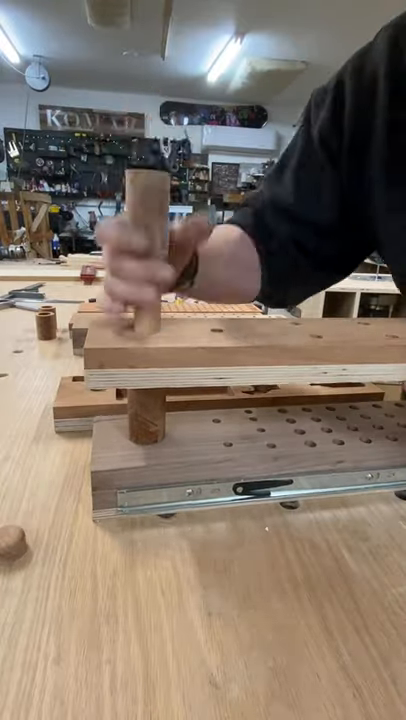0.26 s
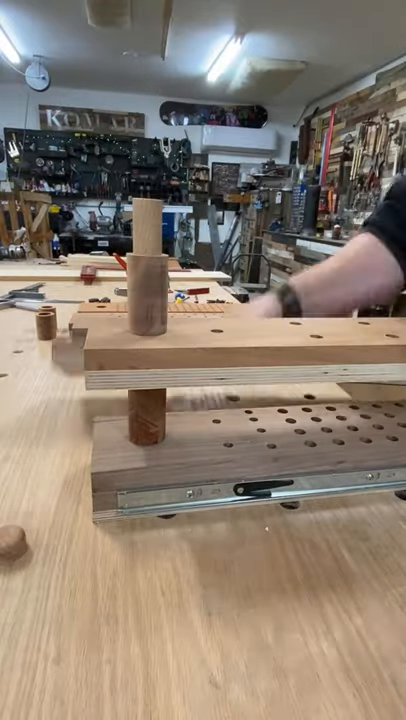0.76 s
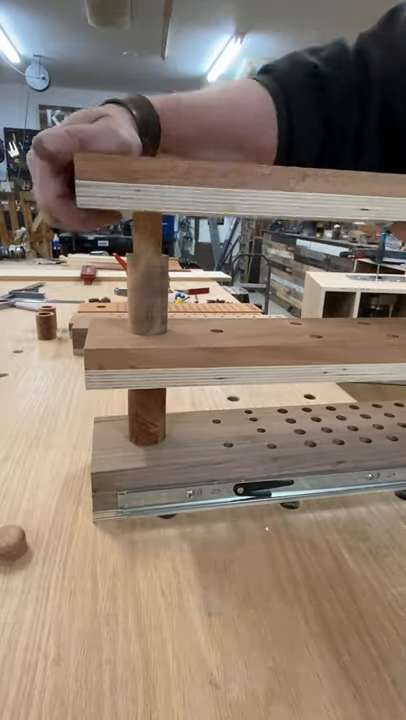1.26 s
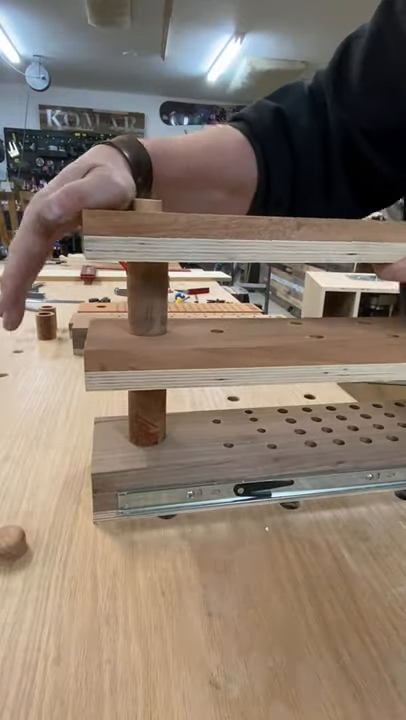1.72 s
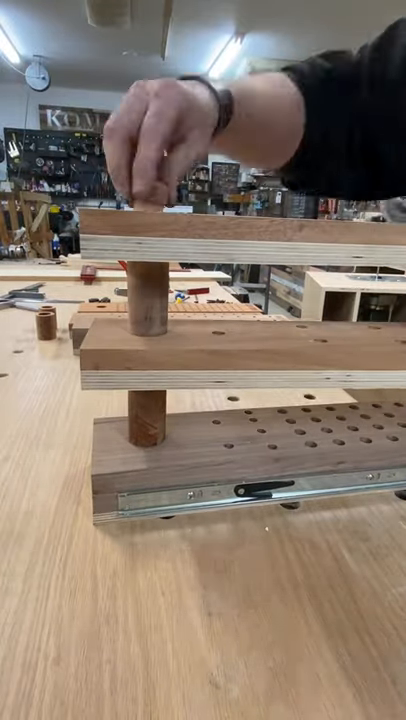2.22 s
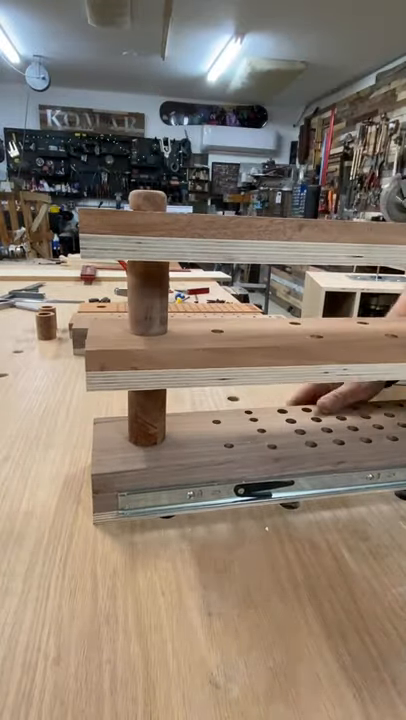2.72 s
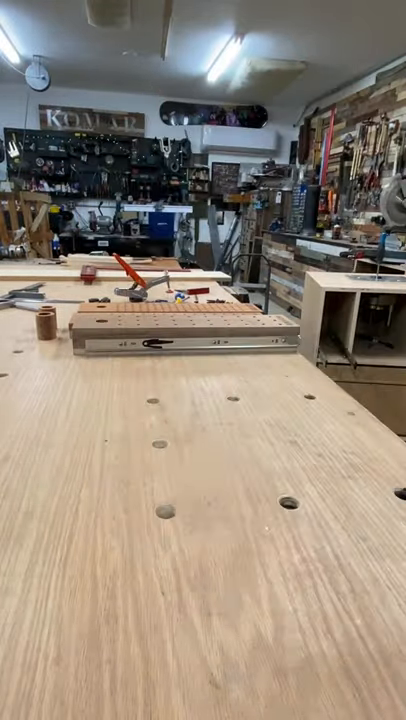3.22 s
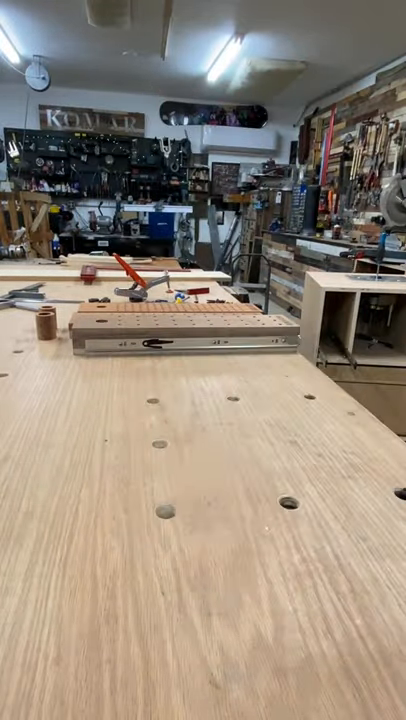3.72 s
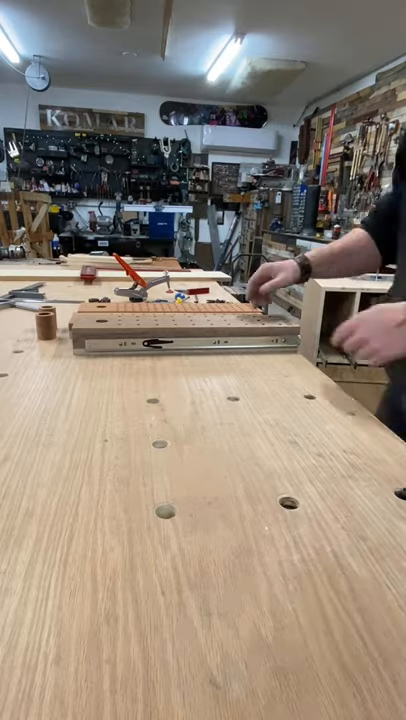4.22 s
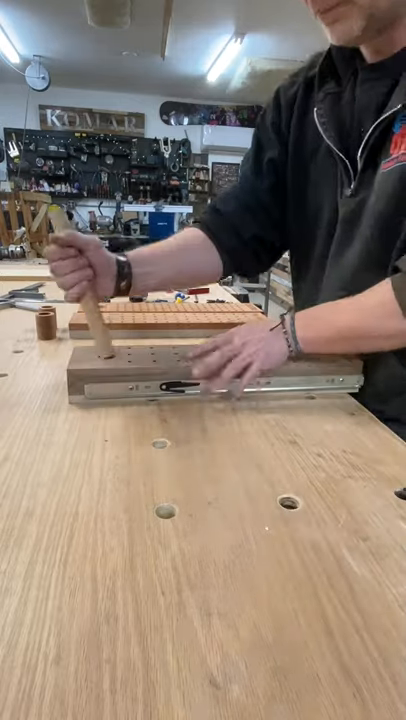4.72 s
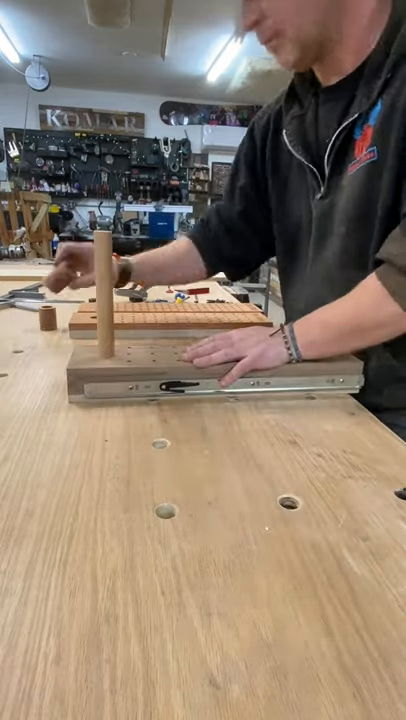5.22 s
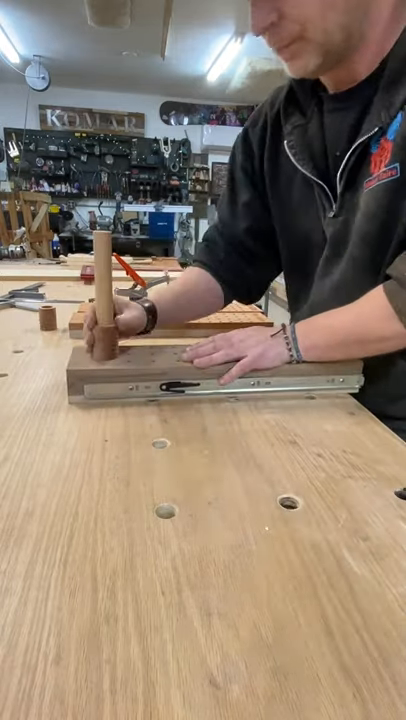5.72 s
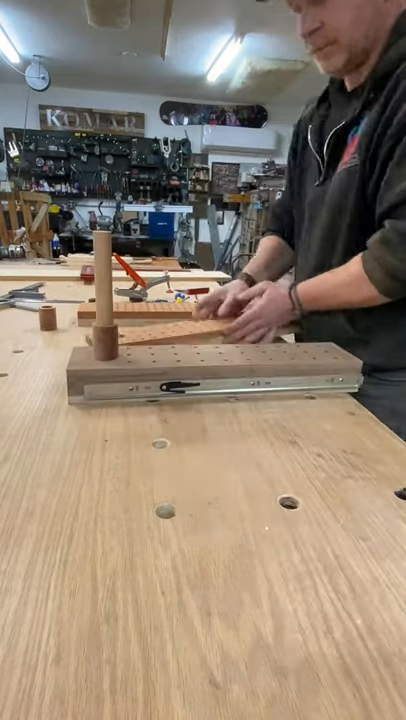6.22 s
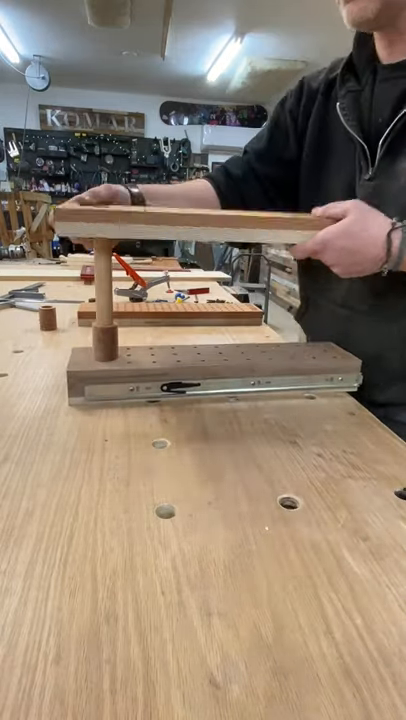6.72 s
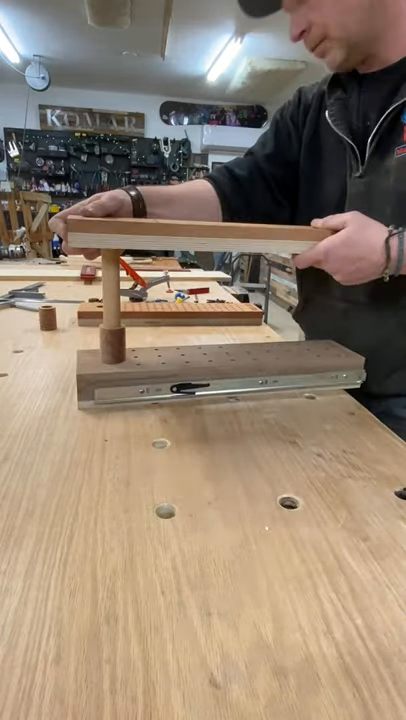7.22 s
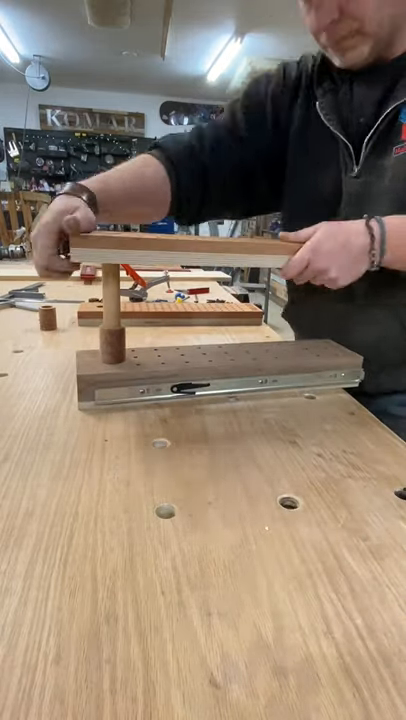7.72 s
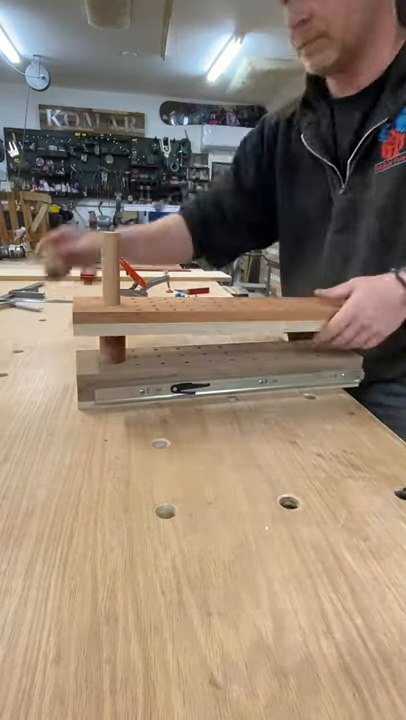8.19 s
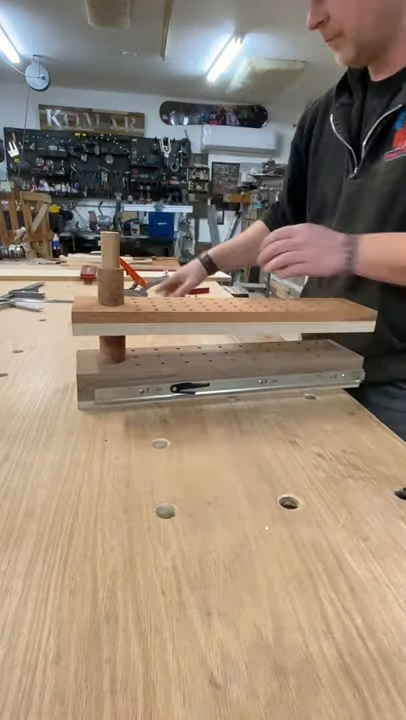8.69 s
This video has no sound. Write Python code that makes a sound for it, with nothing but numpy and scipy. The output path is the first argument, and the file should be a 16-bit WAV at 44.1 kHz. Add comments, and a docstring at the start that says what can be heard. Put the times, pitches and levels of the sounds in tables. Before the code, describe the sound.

Close, dry wood-on-wood knocks and gritty short slides as pieces are stacked on a bench in a quietly humming, well-damped workshop.

```python
"""Woodwork at the bench

Wooden boards, dowels and spacer sleeves slide together and knock down on a workbench, close to the microphone.
Each contact is a short noise crack that rings the piece, the bench and the dowel, and scatters in the room.
Wood rubbing on wood is a string of tiny slips through the same modes; cloth and skin are smooth shaped noise.
The workshop is well damped: ventilation is a low noise rush with a few faint, unsteady motor lines."""
import sys
import numpy as np
from scipy import signal
from scipy.fft import rfft, irfft, next_fast_len
from scipy.io import wavfile
from scipy.ndimage import map_coordinates

SR = 44100
rng = np.random.default_rng(int(sys.argv[2]) if len(sys.argv) > 2 else 0)


def unload_audio(sound):
    """Save the sound as a 16-bit wav file, at the path given as the first command line argument."""
    columns = np.transpose(np.atleast_2d(sound))
    # keep every value between -1 and 1, then stretch to whole-number steps
    steps = np.round(np.clip(columns, -1, 1) * 32767)
    wavfile.write(sys.argv[1], SR, steps.astype(np.int16))


N = 394694
HIT_SIZE = 16384  # samples in one hit with its tail
TOP_HZ = 15900  # upper band limit
MID_HZ, MID_OCTAVES = 1400, 1.7  # centre and width of the midrange; brightness tilts about this centre
NEAR_UNTIL_S = 2.7  # the stack stands close to the microphone until it is lifted away
NEAR_DOWEL_DB, FAR_DOWEL_DB = 5.5, -8  # base strength of the dowel's ring before and after that

# Ventilation colour, relative: f/Hz, density/dB per Hz
AIR_COLOUR = [(30, -51.5), (60, -41.5), (100, -19.5), (150, -16), (240, 2.5), (400, -9), (490, -9),
              (720, -19), (960, -16.5), (1300, -25.5), (3000, -38.5), (5600, -40.5), (16000, -43)]
# Fan motor lines: f/Hz, level/dB RMS
MOTOR_LINES = [(119.8, -76), (240, -73), (479.1, -70), (958.2, -78)]
# Decay of the room: f/Hz, T60/s
ROOM_T60 = [(100, .24), (260, 0.18), (700, 0.12), (1840, 0.098), (4850, 0.13), (12800, 0.12)]
# Colour of what is sent to the room, relative: f/Hz, level/dB
ROOM_SEND = [(100, -14.5), (300, -2), (1000, 0), (3000, -4), (8000, -10), (15000, -4.5)]
# Likeness of left and right in diffuse sound: f/Hz, correlation
LIKENESS = [(200, 0.95), (600, 0.96), (1200, 0.78), (3000, 0.33), (12000, 0.77)]

# Level difference between the microphone ports: f/Hz, left minus right/dB
PORT_BALANCE = [(60, -2.5), (110, 0), (200, 1.5), (380, 0), (700, 0.5), (1290, 1.5), (2380, 1.5),
                (4400, 1.5), (8120, -1.0), (12500, -4), (15000, -3)]
# Phase between the ports, a full turn slipping near 3 kHz: f/Hz, left lead/rad
PORT_LEAD = [(1400, 0), (2000, -1.1), (2500, -.9), (2850, -1.8), (3050, -3.7), (3500, -6.4), (5300, -6.6),
             (7500, -6.1), (10500, -5.1)]
# Colour shared by both ports: f/Hz, level/dB
PORT_COLOUR = [(2200, 0), (2800, 0.5), (3600, 0.5), (6600, 0.5), (7400, -3), (8400, -0.5), (12000, -0.5),
               (14500, -3)]

# Modes of the bench top with the boards on it: f/Hz, width/Hz, relative level/dB
BENCH_MODES = [(127.3, 9.7, 7.5), (228.9, 7.3, 6), (229.4, 15, 17), (243.5, 24, 17.5), (311.8, 29, -6.5),
               (345, 76, 7), (395, 82, -3.5), (471.6, 12, 7.5), (615, 54, 3), (705, 430, -7),
               (1033, 190, 3.5), (1005, 67, -1), (1136.3, 8, -2), (1250, 38, -4), (1390, 91, 5),
               (1640, 63, -0.5), (1830, 8, 2.5), (2150, 55, 3)]
# Modes of the upright dowel and its sleeves: f/Hz, width/Hz, relative level/dB
DOWEL_MODES = [(2210, 84, -6.5), (3720, 140, 6), (5220, 330, 2.5), (5700, 970, -1), (6370, 250, -1.5),
               (9010, 260, -2.5), (12000, 1400, -2)]

# Fingers shifting on the wood: start/s, end/s
GRIPS = [(0.01, 2.8), (6.3, 7.8)]
# Colour of skin on wood, relative: f/Hz, density/dB per Hz
SKIN_COLOUR = [(300, -28), (2000, -10.5), (5500, 2), (7000, -4.5), (9000, -2.5), (16000, -6)]
# Raw colour of rubbing, relative: f/Hz, density/dB per Hz
RUB_COLOUR = [(50, -49.5), (100, -26), (160, -14), (240, -1.5), (370, -5), (500, 0), (850, -8),
              (1500, -14.5), (2800, -25.5), (5000, -34), (8500, -28.5), (16000, -36)]
# Band edges for rubbing: f/Hz
RUB_EDGES_HZ = [150, 700, 2400, 7000, 16000]
# Quick slides over bench or dowel; the one at 1.7 s is a board sliding on a sleeve just before it lands: peak
# t/s, rise/s, fall/s, level before the swell/dB, brightness/dB per octave, midrange/dB
SLIDES = [(0.11, 0.03, 0.014, -38.5, -0.9, -8), (0.163, 0.018, 0.011, -29, -2.2, -0.05),
          (0.383, 0.017, 0.013, -33, -3, -0.5), (0.41, 0.006, 0.009, -29.5, -4, 9),
          (1.7, 0.02, 0.022, -39.5, 2.1, 4), (2.65, 0.0083, 0.034, -47, 0, 1),
          (2.815, 0.058, 0.073, -39, 0.4, 9), (2.93, 0.068, 0.047, -34.5, -1.3, 1),
          (3.58, 0.07, 0.17, -52, -1.35, 6), (4.376, 0.032, 0.044, -56, 1, 0.5),
          (4.492, 0.067, 0.093, -43, 1.84, 2.6), (5.54, 0.044, 0.029, -34, -2, -9),
          (6.043, 0.084, 0.11, -41.5, 1, 4.5), (6.186, 0.011, 0.057, -42.5, -1.5, 10.5),
          (7.808, 0.035, 0.055, -32, 0.9, -10.5), (8.73, 0.036, 0.088, -43, 1.1, 3.5)]
# Pieces worked slowly into place; the one at 4.893 s is a dowel sliding briefly in its hole just before a
# knock: peak t/s, rise/s, fall/s, level before the swell/dB, brightness/dB per octave
DRAGS = [(0.549, 0.03, 0.046, -51.5, 0.3), (1.279, 0.084, 0.061, -40, -1.1), (1.36, 0.08, 0.073, -40, 1.4),
         (1.51, 0.037, 0.05, -41.5, 0.2), (2.0, 0.095, 0.049, -48.5, 3.5),
         (2.309, 0.037, 0.21, -53.5, -0.6), (2.523, 0.015, 0.036, -50.5, 2.5), (4.55, 0.05, 0.11, -37, 1.5),
         (4.83, 0.068, 0.061, -42, -1.5), (4.893, 0.016, 0.0067, -30.5, 2.7),
         (4.999, 0.046, 0.047, -45.5, -0.0), (6.82, 0.1, 0.074, -53.5, 1), (7.15, 0.083, 0.064, -43, -0.7),
         (7.308, 0.08, 0.082, -43, 0.8), (7.5, 0.091, 0.11, -51.5, 1.3)]
# Clothing swishes: peak t/s, rise/s, fall/s, level before the swell/dB, brightness/dB per octave
SWISHES = [(2.131, 0.021, 0.038, -62, -3.5), (3.139, 0.036, 0.086, -56.5, -2.5),
           (3.379, 0.073, 0.04, -55.5, -1), (3.965, 0.17, 0.11, -63.5, -0.7)]
# Tone of each kind of rubbing, one value per rubbing band: relative level/dB
SLIDE_TONE = [-1.5, -7, -7, -14]
DRAG_TONE = [0, -11.5, -19.5, -28.5]
SWISH_TONE = [-21, -7, 3.5, -1]

# Band edges for contacts: f/Hz
HIT_EDGES_HZ = [90, 320, 800, 2400, 7000, 16000]
# A dowel or sleeve lands in its seat:
# t/s, level/dB, brightness/dB per octave, midrange/dB, piece f/Hz, relative piece ring/dB, room send/dB
SEATINGS = [(0.1282, -39, -2.5, 4, 498, 6, 1), (0.1507, -36, -2, 7, 462, -6, 3.5),
            (0.1832, -23.5, -3.5, 6.5, 427, -8.5, 5.5), (0.3714, -37.5, 2.4, -10, 497, -4.5, -1),
            (0.4048, -30.5, 1, -8, 507, -2.5, 0), (0.4192, -17.5, 1.84, 3, 5263, 5.5, -3.5),
            (4.8992, -18.5, 2, -1, 8230, 9.5, 1), (5.6992, -19.5, 1.5, -10, 3777, 2, 7.5),
            (8.4372, -24.5, -0.9, -0.5, 373.6, 7.5, 7), (8.4767, -18, 1.35, -2.5, 372, 7.5, 0.5)]
# A board claps down on wood:
# t/s, level/dB, brightness/dB per octave, midrange/dB, piece f/Hz, relative piece ring/dB, room send/dB
CLACKS = [(0.9114, -28.5, 0, -4.5, 2040, 11.5, 0.0), (0.9546, -13.8, 1.3, -6, 2083, 11.5, 0.0),
          (1.7042, -18, -0.2, -3, 1910, 1, -5), (3.4573, -38, -0.6, 8, 596, 18, 14),
          (3.4962, -33, -0.2, 4, 1333, 3.5, 9.5), (4.4937, -27.2, -0.5, -7, 494.3, -8.5, 12),
          (5.4702, -43.5, 1, 4, 1180, 20.5, 6.5), (6.1972, -29, 0, 1, 966, 2, 6),
          (6.2202, -27, 0.06, -4, 984, -10.5, 6), (7.8447, -10.7, 1.17, -4.5, 1912.0, 3.5, 0.5),
          (8.8195, -36.5, -0.85, 5.5, 1006, 7, 8.5)]
# A held piece bumps softly: t/s, level/dB, brightness/dB per octave, bench thump (lowest band)/dB, piece f/Hz
BUMPS = [(0.9978, -36.5, -2, -13, 491), (1.2145, -44.5, 1, -2.5, 448), (1.2429, -36.5, 4, 6, 455),
         (1.2728, -41, 3, 15.5, 230), (1.3582, -43.5, 2, -1, 1010), (1.3809, -39, 3, -17, 1000),
         (1.4234, -41.5, -0.1, -11, 1040), (2.2697, -58.5, 3, 23.5, 240), (2.298, -45, 4.5, 4, 546),
         (2.8917, -41, -1.5, -4, 730), (4.5514, -41.5, -1.5, -12.5, 452), (4.698, -43.5, -0.8, -8.5, 627),
         (4.803, -46, -0.5, 4, 407), (4.8311, -42.5, 0, 1, 474), (6.479, -37, -5, -16.5, 399),
         (7.0681, -33.5, -2, -10.5, 419), (7.0986, -38, -1.5, -3.5, 397), (7.2534, -47.5, -1.9, 0.5, 426),
         (8.6806, -48, -1, -6, 450)]
# Edges and small pieces touch: t/s, level/dB, brightness/dB per octave, piece f/Hz, relative piece ring/dB
TICKS = [(0.5414, -59, 1, 2440, 23), (0.6706, -57, -2.5, 4790, 12.5), (0.8128, -69, 3.5, 5080, 15),
         (0.8535, -69.5, 2.5, 5100, 15.5), (1.3379, -47, 0.5, 1000, 9), (1.4862, -48.5, 0.3, 3750, 17),
         (1.5821, -55.5, -2.2, 480, 0), (1.857, -63, 1.2, 5580, 17), (2.1815, -56.5, 4.5, 5510, 23.5),
         (2.268, -62, 0, 5500, 24), (4.734, -47.5, 1.6, 4160, 10), (5.524, -56, 4.5, 497, -1),
         (8.113, -60.5, -1.5, 1040, 3), (8.2231, -46.5, -0.5, 3540, 10.5)]
# Tone of each kind of contact, one value per contact band: relative level/dB
SEATING_TONE = [-5, -0.5, -7.5, -7.5, -12]
CLACK_TONE = [-9, -1, -0.1, -9, -22.5]
BUMP_TONE = [1.4, 1.5, -10, -20.5, -27.5]
TICK_TONE = [-0.5, -1, -3, -1, -6.5]


def amp(db):
    """Decibels to linear gain."""
    return 10 ** (np.asarray(db) / 20)


def unit(x):
    """x brought to an RMS of 1."""
    return x / np.sqrt(np.mean(x ** 2) + 1e-20)


def along(points, hz):
    """Read (Hz, value) points on a log frequency axis."""
    f, values = np.transpose(points)
    return np.interp(np.log(hz + 1), np.log(f + 1), values)


def wobble(rate):
    """A smooth random curve with this many knots a second."""
    knots = rng.standard_normal(int(N * rate / SR) + 4)
    return map_coordinates(knots, [np.arange(N) * rate / SR], order=2)


def filtered(x, response):
    """Filter x by a response given as a function of frequency."""
    n = x.shape[-1]
    padded = next_fast_len(n + HIT_SIZE)
    f = np.fft.rfftfreq(padded, 1 / SR)
    return irfft(rfft(x, padded) * response(f), padded)[..., :n]


def resonance(f, centre, width):
    """A causal mode with a peak gain of 1."""
    return 1j * f * width / (centre ** 2 - f ** 2 + 1j * f * width)


def modes(table, f):
    """The summed response of a table of modes."""
    return sum(amp(db) * resonance(f, hz, width) for hz, width, db in table)


def loose_modes(f, count=18, quality=48, strength=1.1):
    """The boards' higher modes, drawn afresh on each call: they shift with every grip and support."""
    place, size = rng.random((2, count))
    centres = 650 * 2 ** (3.4 * (np.arange(count) + place) / count)
    total = 0
    for k, hz in enumerate(centres):
        total = total + strength * (-1) ** k * (.5 + size[k]) * resonance(f, hz, hz / quality)
    return total


def causal(gain):
    """The minimum-phase response that has this gain, by folding its cepstrum."""
    cepstrum = irfft(np.log(np.maximum(gain, 1e-6)))
    half = len(cepstrum) // 2
    cepstrum[1:half] *= 2
    cepstrum[half + 1:] = 0
    return np.exp(rfft(cepstrum))


def tone(base_db, edges, level_db, brightness, mid_db=0):
    """Band levels of one event: the tone of its kind, tilted by brightness, with more or less midrange."""
    octaves = np.log2(np.sqrt(np.multiply(edges[1:], edges[:-1])) / MID_HZ)
    midrange = mid_db * np.exp(-(octaves / MID_OCTAVES) ** 2)
    return np.array(base_db) + level_db + brightness * octaves + midrange


def band_gain(x, edges, levels_db, f):
    """The smooth gain on f that brings the stereo piece x towards the given band levels."""
    size = HIT_SIZE * 2
    power = 2 * np.mean(abs(rfft(x, size)) ** 2, 0) / (size * x.shape[1])
    bands = np.histogram(np.fft.rfftfreq(size, 1 / SR), edges, weights=power)[0]
    centres = np.sqrt(np.multiply(edges[1:], edges[:-1]))
    change_db = levels_db - 10 * np.log10(abs(bands) + 1e-20)
    return amp(along(np.c_[centres, change_db], f))


def diffuse(pair):
    """Two unrelated signals become left and right, most alike in the bass."""
    turn = lambda f: np.arccos(np.clip(along(LIKENESS, f), -1, 1)) / 2
    mid, side = filtered(pair, lambda f: np.array([np.cos(turn(f)), np.sin(turn(f))]))
    return np.array([mid + side, mid - side])


def room_tail(late_db=-20, late_t60=0.31):
    """Spectrum of a fresh stereo tail: nearby surfaces answer briefly, the far end of the shop fainter, longer."""
    f, t, noise = signal.stft(rng.standard_normal((2, HIT_SIZE)), SR, nperseg=256)
    t60 = along(ROOM_T60, f)[:, None]
    early = amp(-60 * t / t60)
    late = amp(late_db - 60 * t / late_t60) / (1 + f[:, None] / 5000)
    energy = np.sqrt(np.log(1e6) / (t60 * SR))  # keeps short and long early decays equally strong
    tail = signal.istft(noise * (early + late) * energy, SR, nperseg=256)[1][:, :HIT_SIZE]
    onset = 1 - np.exp(-np.arange(HIT_SIZE) / SR / .0015)  # builds up over 1.5 ms
    return rfft(diffuse(tail) * onset)


def workshop(air_db=-59, drift_db=1, waver=0.24):
    """Ventilation: a low, drifting noise rush with a few motor lines whose phase wavers (rad)."""
    t = np.arange(N) / SR
    air = unit(filtered(diffuse(rng.standard_normal((2, N))), lambda f: amp(along(AIR_COLOUR, f))))
    hum = sum(amp(db) * np.sqrt(2) * np.sin(2 * np.pi * hz * t + waver * wobble(22))
              for hz, db in MOTOR_LINES)
    return amp(air_db + drift_db * wobble(12)) * air + hum


def fingers(level_db=-77, lumps_db=5):
    """Skin creeps over sanded wood: a faint whisper of noise with uneven level."""
    t = np.arange(N) / SR
    holding = sum(np.interp(t, [start, start + .1, end - .1, end], [0, 1, 1, 0]) for start, end in GRIPS)
    whisper = unit(filtered(diffuse(rng.standard_normal((2, N))), lambda f: amp(along(SKIN_COLOUR, f))))
    return holding * amp(level_db + lumps_db * wobble(24)) * whisper


def strokes(slide_grit=.45, drag_grit=.8, swish_grit=0.024):
    """Each swell as (peak s, rise s, fall s, band levels dB, grit 0-1): drags are grittiest, cloth least."""
    kinds = ((SLIDES, SLIDE_TONE, slide_grit), (DRAGS, DRAG_TONE, drag_grit),
             (SWISHES, SWISH_TONE, swish_grit))
    for table, base_db, grit in kinds:
        for peak, rise, fall, *voice in table:
            yield peak, rise, fall, tone(base_db, RUB_EDGES_HZ, *voice), grit


def rubbing(slips_per_s=170, rush_share=0.1, board_share=1.0, dowel_share=2.7, room_db=-7, swell=1.7):
    """Cloth gives a smooth rush; wood fibres catch and slip, and each slip rings board and dowel."""
    t = np.arange(N) / SR
    colour = lambda f: amp(along(RUB_COLOUR, f))
    wood = lambda f: .5 + board_share * modes(BENCH_MODES, f) + dowel_share * modes(DOWEL_MODES, f)
    rush = unit(diffuse(rng.standard_normal((2, N))))
    impulses = (rng.random(N) < slips_per_s / SR) * rng.standard_normal(N)
    slips = unit(impulses) + rush_share * rush
    gritty = unit(filtered(slips, lambda f: colour(f) * wood(f)))
    smooth = unit(filtered(diffuse(rng.standard_normal((2, N))), colour))
    stutter = amp(2.8 * wobble(80))  # the hand's pressure is never even
    out = np.zeros((2, N))
    for peak, rise, fall, levels_db, grit in strokes():
        start, end = peak - rise, peak + fall
        span = slice(max(0, round(start * SR)), round(end * SR))
        rub = np.sqrt(grit) * gritty[:, span] + np.sqrt(1 - grit) * smooth[:, span]
        rub = rub * stutter[span]
        rub = filtered(rub, lambda f: 1 + 2 * np.sqrt(grit) * loose_modes(f))
        rub = filtered(rub, lambda f: band_gain(rub, RUB_EDGES_HZ, levels_db, f))
        ramp = np.interp(t[span], [start, peak, end], [0, 1, 0])
        out[:, span] += rub * np.sin(np.pi / 2 * ramp) ** swell
    room = signal.fftconvolve(out, irfft(room_tail()), axes=1)[:, :N]
    return out + amp(room_db) * room


def contacts(bump_ring_db=-1, bump_room_db=0, tick_room_db=1, tick_dowel_db=6, seating_dowel_db=6,
             clack_dowel_db=-4):
    """Every contact as (s, band levels dB, piece Hz, relative piece ring dB, room send dB, dowel ring dB)."""
    stack_db = lambda s: NEAR_DOWEL_DB if s < NEAR_UNTIL_S else FAR_DOWEL_DB
    kinds = (SEATINGS, SEATING_TONE, seating_dowel_db), (CLACKS, CLACK_TONE, clack_dowel_db)
    for table, base_db, extra_db in kinds:
        for s, db, brightness, mid_db, ring_hz, ring_db, room_db in table:
            levels_db = tone(base_db, HIT_EDGES_HZ, db, brightness, mid_db)
            yield s, levels_db, ring_hz, ring_db, room_db, stack_db(s) + extra_db
    for s, db, brightness, thump_db, ring_hz in BUMPS:
        levels_db = tone(BUMP_TONE, HIT_EDGES_HZ, db, brightness)
        levels_db[0] += thump_db
        yield s, levels_db, ring_hz, bump_ring_db, bump_room_db, stack_db(s)
    for s, db, brightness, ring_hz, ring_db in TICKS:
        levels_db = tone(TICK_TONE, HIT_EDGES_HZ, db, brightness)
        yield s, levels_db, ring_hz, ring_db, tick_room_db, tick_dowel_db


def voiced(hit, levels_db):
    """Steer the first 20 ms of a hit's spectrum to the band levels; returns the sound, faded at its end."""
    f, head = np.fft.rfftfreq(HIT_SIZE, 1 / SR), SR // 50
    for _ in range(2):  # the second pass tightens the first
        hit = hit * causal(band_gain(irfft(hit)[:, :head], HIT_EDGES_HZ, levels_db, f))
    return irfft(hit) * np.clip(np.linspace(4, -1, HIT_SIZE), 0, 1)


def knocks(crack_s=0.00041, graze_s=0.0021, crack_hz=900, piece_q=24, piece_db=7, split=0.95, thud_db=-4,
           bending_lag_s=0.001571):
    """Each contact is a brief crack that rings piece, bench and dowel, and scatters through the shop."""
    out = np.zeros((2, N + HIT_SIZE))
    t, f = np.arange(HIT_SIZE) / SR, np.fft.rfftfreq(HIT_SIZE, 1 / SR)
    bright = (1j * f / (crack_hz + 1j * f)) ** 2
    send = amp(along(ROOM_SEND, f)) * (1j * f / (150 + 1j * f)) ** 3
    radiation = (1j * f / (70 + 1j * f)) ** 2  # boards radiate little deep bass
    # bending waves are slow in the bass: the lag (given at 400 Hz) goes with 1 / sqrt(f)
    bending = np.exp(-4j * np.pi * bending_lag_s * np.sqrt(400 * f))
    bench = np.array([amp(db) * resonance(f, hz, width) for hz, width, db in BENCH_MODES])
    dowel = modes(DOWEL_MODES, f)
    hardest_db = max(max(row[1]) for row in contacts())
    for s, levels_db, ring_hz, ring_db, room_db, dowel_db in contacts():
        force = amp(max(levels_db) - hardest_db)
        contact_s = crack_s + graze_s * np.exp(-force / 0.13)  # light touches graze, hard blows snap
        crack = rng.standard_normal(HIT_SIZE) * t * np.exp(-t / contact_s)
        crack = rfft(crack / np.linalg.norm(crack)) * bright
        wood = amp(rng.normal(0, 2, len(bench))) @ bench  # each spot feeds the modes differently
        # the grain splits the piece's ring into a close pair
        width = ring_hz / piece_q
        pair = [(ring_hz, width, 0), (ring_hz * split, width, -3)]
        piece = amp(ring_db + piece_db) * modes(pair, f)
        thud = amp(thud_db) * force * resonance(f, 55, 80)  # deep and short, growing with loud contacts
        ringing = amp(dowel_db) * dowel
        body = (wood + loose_modes(f) + piece) * radiation + thud
        direct = crack * (1 + ringing) + body * bending
        # each spot lies at its own angle to the two ports
        delay_s = rng.normal(0, 2e-5)
        direct = direct * np.exp(1j * np.pi * np.array([[1], [-1]]) * np.minimum(f, 2500) * delay_s)
        scatter = send * room_tail() * np.sqrt(1 + abs(piece) + abs(ringing) ** 2)
        hit = direct + amp(room_db) * scatter
        out[:, round(s * SR):][:, :HIT_SIZE] += voiced(hit, levels_db)
    return out[:, :N]


def scene():
    """The work reaches the two microphone ports with different level and phase, over the workshop's air."""
    sides = np.array([[.5], [-.5]])  # left, right
    level = lambda f: amp(along(PORT_COLOUR, f) + sides * along(PORT_BALANCE, f))
    phase = lambda f: np.exp(1j * (sides + .5) * along(PORT_LEAD, f))  # turns the left port only
    work = fingers() + rubbing() + knocks()
    return workshop() + filtered(work, lambda f: level(f) * phase(f))


def record(dry):
    """The sharpest peaks are rounded off, and a steep filter cuts what lies above the band limit."""
    rounded = dry / (1 + (dry / .9) ** 4) ** (1 / 4)
    return filtered(rounded, lambda f: 1 / np.sqrt(1 + (f / TOP_HZ) ** 120))


dry = scene()
out = record(dry)
unload_audio(out)
```